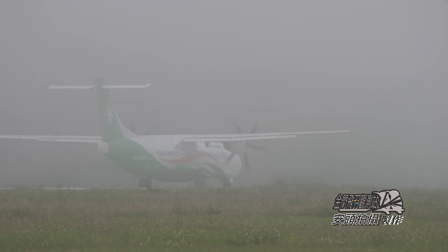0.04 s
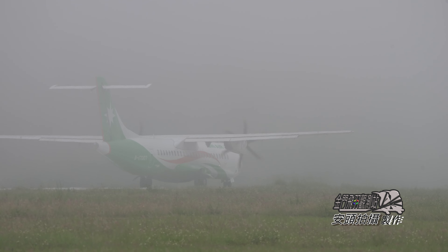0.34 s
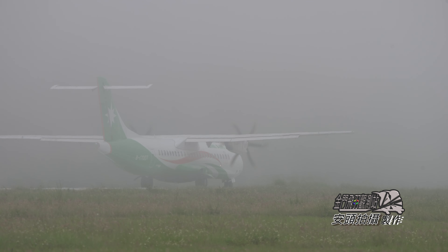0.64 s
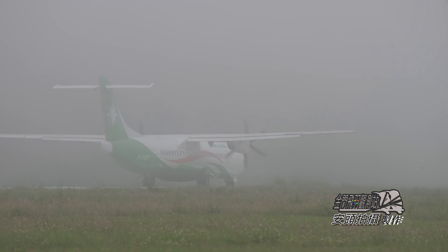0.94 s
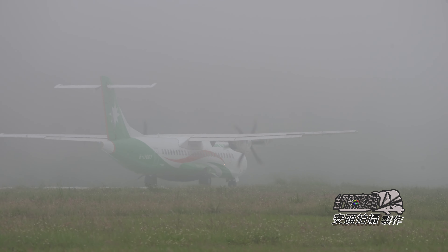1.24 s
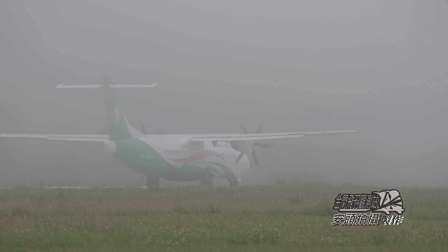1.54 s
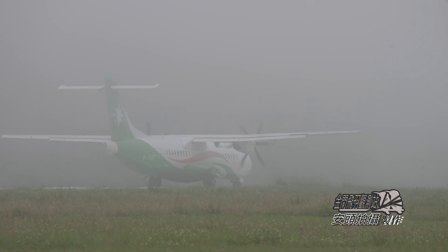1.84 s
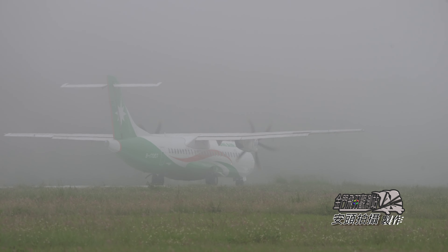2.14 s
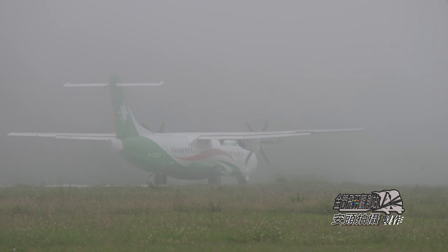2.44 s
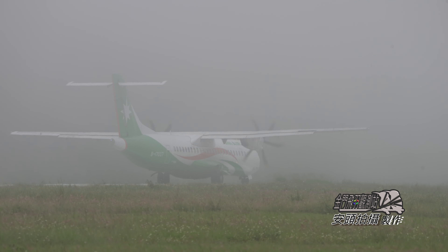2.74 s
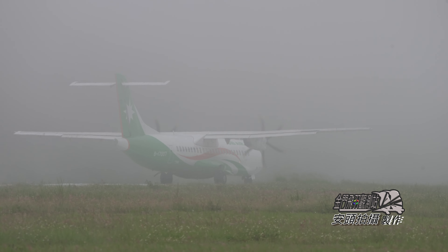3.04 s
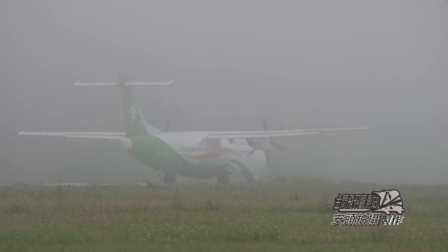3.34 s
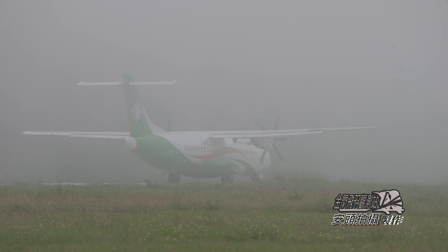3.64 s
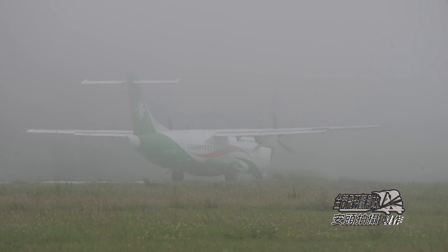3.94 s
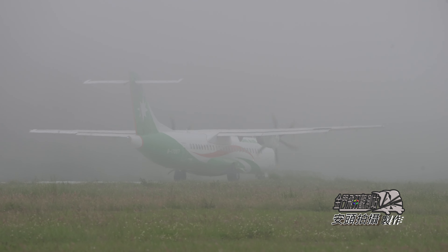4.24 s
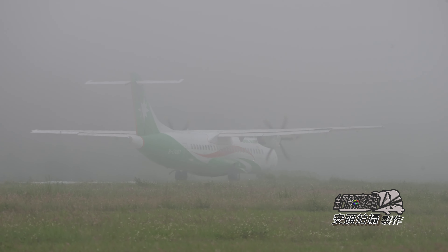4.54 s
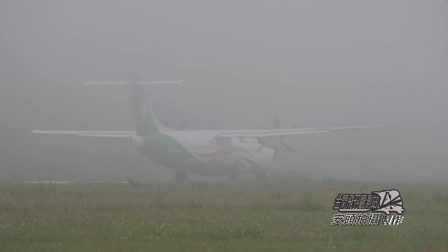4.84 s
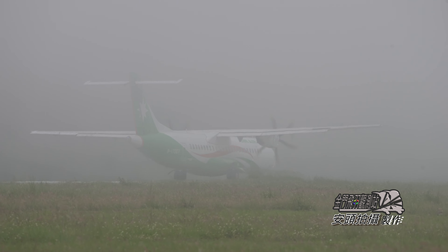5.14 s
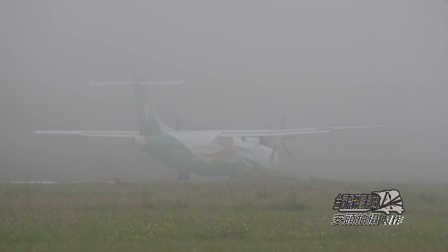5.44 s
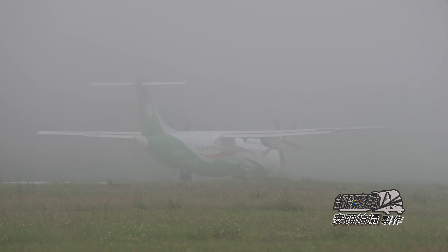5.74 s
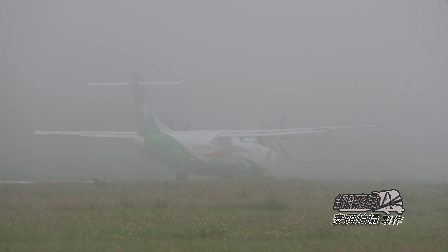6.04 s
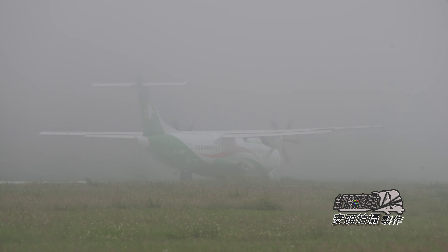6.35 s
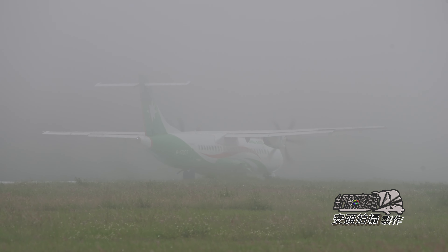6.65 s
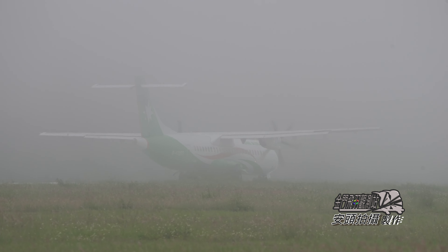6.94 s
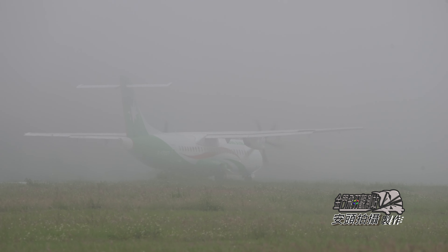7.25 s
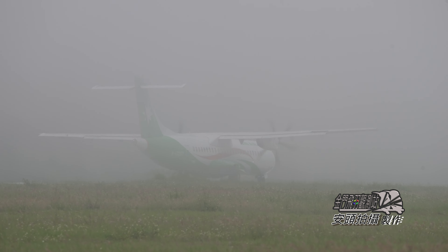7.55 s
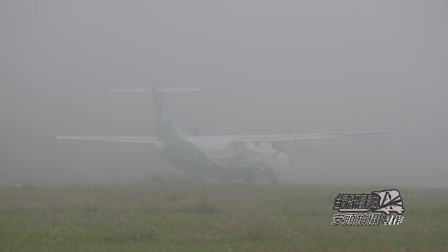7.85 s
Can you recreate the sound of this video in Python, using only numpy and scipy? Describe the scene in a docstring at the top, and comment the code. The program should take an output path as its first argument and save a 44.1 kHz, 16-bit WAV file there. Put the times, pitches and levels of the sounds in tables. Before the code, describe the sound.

A twin turboprop airliner taxis far off across a grass field, its propellers droning unevenly under a turbine hiss and faint whine. As it turns away, the rush of blown air swells and brightens, and the propellers rise in pitch. Wind thumps and flutters on the microphone throughout. Close by, a faint, high, insect-like buzz comes and goes, and a tiny motor whirs softly, then stops.

```python
"""A distant turboprop taxiing in the wind

A twin turboprop airliner taxis far off across a grass field. Its propellers drone and its turbines
hiss and whine; as it turns away, the air blown back by the propellers swells and brightens.
Wind buffets the microphone, a thin high buzz comes and goes close by, and a tiny motor,
probably in the lens, whirs faintly and stops."""
import sys
import numpy as np
from scipy import signal
from scipy.fft import rfft, irfft, next_fast_len
from scipy.io import wavfile
from scipy.ndimage import uniform_filter1d, map_coordinates

SR = 44100
rng = np.random.default_rng(int(sys.argv[2]) if len(sys.argv) > 2 else 0)


def unload_audio(sound):
    """Save the sound as a 16-bit wav file, at the path given as the first command line argument."""
    columns = np.transpose(np.atleast_2d(sound))
    # keep every value between -1 and 1, then stretch to whole-number steps
    steps = np.round(np.clip(columns, -1, 1) * 32767)
    wavfile.write(sys.argv[1], SR, steps.astype(np.int16))


N = 357651


def undb(db):
    """Turn decibels into a number to multiply a sound by."""
    return 10 ** (np.asarray(db) / 20)


def unit(x):
    """Scale a sound to an average strength (rms) of 1."""
    return x / np.sqrt(np.mean(x ** 2))


def curves(table):
    """Join a table's timed points with straight lines, one curve for each value column."""
    times, *columns = np.transpose(table)
    return [np.interp(np.arange(N) / SR, times, column) for column in columns]


def wander(rate_hz):
    """A smooth random curve, about 1 in size, that changes about rate_hz times a second."""
    step = max(int(SR / rate_hz), 1)
    held = np.repeat(rng.standard_normal(N // step + 2), step)[rng.integers(step):][:N]
    return 1.35 * uniform_filter1d(uniform_filter1d(held, step), step)


def swells(events, rest_db):
    """A volume curve: a resting level with a smooth hump for each (peak_s, length_s, level_db)."""
    t = np.arange(N) / SR
    humps = (undb(db) * .5 ** (2 * ((t - peak_s) / length_s) ** 2) for peak_s, length_s, db in events)
    return np.sqrt(undb(rest_db) ** 2 + sum(hump ** 2 for hump in humps))


def fade(at_s, length_s):
    """Fall from 1 to 0 over length_s, centred on at_s."""
    return np.clip(.5 - (np.arange(N) / SR - at_s) / length_s, 0, 1)


def noise(colour):
    """Noise of strength 1, shaped by (pitch_hz, level_db) points."""
    size = next_fast_len(N)
    bins_hz = np.maximum(np.fft.rfftfreq(size, 1 / SR), 1)
    hz, db = np.transpose(colour)
    gain = undb(np.interp(np.log(bins_hz), np.log(hz), db))
    return unit(irfft(rfft(rng.standard_normal(size)) * gain, size)[:N])


def resonate(x, hz, width_hz):
    """Make a sound ring in a narrow band around hz, at strength 1."""
    b, a = signal.iirpeak(hz, hz / width_hz, fs=SR)
    return unit(signal.lfilter(b, a, signal.lfilter(b, a, x)))


def turning(hz):
    """The angle of something that turns hz times a second."""
    return 2 * np.pi * np.cumsum(hz) / SR


def eddies(colour, span_s):
    """The push of swirling air: noise evened out over span_s, ready to follow a gust."""
    swirl = noise(colour)
    return swirl / np.sqrt(uniform_filter1d(swirl ** 2, int(span_s * SR)))


# The breeze, with an early lull: time_s, relative_db
BREEZE_LEVELS = [(0, -26), (0.8, -27.5), (1.7, -34.5), (2.9, -34), (3.9, -27), (6.4, -24), (7.1, -25.5),
                 (8.11, -25)]
# Gusts on top of it: peak_s, length_s, thump_relative_db, flutter_relative_db
WIND_GUSTS = [(0.466, 0.23, -19.5, -33.5), (1.028, 0.085, -34, -41), (2.56, 0.19, -27.5, -41.5),
              (3.04, 0.058, -25.5, -46), (3.32, 0.078, -27.5, -47), (3.826, 0.25, -22.5, -45),
              (4.251, 0.15, -19, -37.5), (4.645, 0.23, -21, -33), (5.344, 0.41, -22, -42),
              (6.056, 0.16, -22.5, -35.5), (6.46, 0.2, -19.5, -26.5), (6.754, 0.36, -30, -36),
              (7.975, .4, -24, -28.5)]
# The tone of the deep thumps and of the lighter flutter: pitch_hz, relative_db
THUMP_COLOUR = [(2, -13), (7, 0.5), (12, 0.5), (22, -7.5), (40, -12.5), (60, -18.5), (100, -24.5),
                (160, -39), (300, -68.5), (700, -108)]
FLUTTER_COLOUR = [(30, -12.5), (70, -1.5), (120, 3), (175, -1), (230, -7), (320, -13), (500, -24),
                  (1200, -70)]

def wind(thump_gain_db, flutter_gain_db, unrest_db):
    """Big swirls of air thump the microphone and small ones flutter across it."""
    breeze_db = curves(BREEZE_LEVELS)[0]
    flutter_rest_db = -21 + 0.64 * breeze_db  # small swirls grow more slowly than the breeze
    thump_level = swells([(s, length, db) for s, length, db, _ in WIND_GUSTS], breeze_db)
    flutter_level = swells([(s, length, db) for s, length, _, db in WIND_GUSTS], flutter_rest_db)
    thumps = undb(thump_gain_db) * thump_level * eddies(THUMP_COLOUR, span_s=0.222)
    flutter = undb(flutter_gain_db) * flutter_level * eddies(FLUTTER_COLOUR, span_s=0.14)
    return undb(unrest_db * wander(10)) * (thumps + flutter)


# The two high notes that ring in the buzz: pitch_hz, width_hz, relative_db
BUZZ_RINGS = [(8600, 380, -4), (9100, 280, -11)]
# Bursts of buzzing: peak_s, length_s, level_db
BUZZ_BURSTS = [(0.7, 0.49, -62.5), (1.42, .24, -64), (1.98, .26, -63.5), (2.44, .2, -66), (3.35, .38, -67),
               (3.98, 0.2, -61), (4.4, .25, -69), (5.15, .2, -69), (6.43, .22, -68), (6.8, .3, -70)]

def high_buzz(tick_hz, jitter, rasp):
    """Fast, scratchy ticks ring two high notes, perhaps an insect in the grass."""
    cycles = turning(tick_hz * (1 + jitter * wander(22))) / (2 * np.pi)
    samples_from_tick = (np.mod(cycles, 1) - .5) * SR / tick_hz
    ticks = np.exp(-samples_from_tick ** 2 / 2)
    scratch = np.sin(np.pi * cycles) ** 4 * rng.standard_normal(N)
    ring = sum(undb(db) * resonate(ticks + rasp * scratch, hz, width) for hz, width, db in BUZZ_RINGS)
    return swells(BUZZ_BURSTS, rest_db=-74) * unit(ring)


# The tones of the gears: multiple_of_motor_speed, relative_db
GEAR_TONES = [(34, -3), (36, 6.5), (38, 5), (40, 0), (41, 10), (42, -7), (43, 7), (44, -6), (45, 3),
              (47, -1)]
# Moments when the whir grows louder: peak_s, length_s, level_db
WHIR_SWELLS = [(0.6, 0.27, -59), (1.75, .9, -57), (4.72, .22, -55.5)]

def small_motor(spin_hz, wobble, wobble_hz, flicker_db, stop_s):
    """Tiny gears whir, then stop; their speed wobbles with each turn of a slow wheel."""
    hz = spin_hz - 2.5 * (1 - fade(at_s=6.6, length_s=.2))
    drift = .001 * wander(2)
    wheel = np.sin(turning(wobble_hz * (1 + 0.209 * wander(5))))
    jitter = 0.003 * wander(60)
    angle = turning(hz * (1 + drift + wobble * wheel + jitter))
    whir = sum(undb(db + flicker_db * wander(22.25)) * np.sin(k * angle + rng.uniform(0, 2 * np.pi))
               for k, db in GEAR_TONES)
    return swells(WHIR_SWELLS, rest_db=-60) * fade(stop_s, length_s=.06) * unit(whir)


# How far the aircraft has turned its tail to us: time_s, share (0 to 1)
TAIL_TURN = [(0, 0.06), (3.15, 0.01), (4.8, 0.26), (6.05, .42), (6.65, 0.67), (7.1, 0.83), (7.8, 1),
             (8.11, .95)]

def tail_on(narrowness):
    """How much of a backward beam of sound points at us; a narrow beam arrives late in the turn."""
    return np.maximum(curves(TAIL_TURN)[0], 0) ** narrowness


def beamed(side_db, rise_db, narrowness):
    """The volume of a noise that grows as the tail swings round."""
    return undb(side_db + rise_db * tail_on(narrowness))


def ground_echo(direct, delay_s, side_share, tail_share):
    """A duller copy bounces off the ground and arrives just late, colouring the sound."""
    late = map_coordinates(direct, [np.arange(N) - SR * delay_s], order=1)
    dull = signal.sosfilt(signal.butter(1, 5000, fs=SR, output="sos"), late)
    share = side_share + (tail_share - side_share) * tail_on(narrowness=6.7)
    return direct + share * dull


def open_air(x, shimmer_db, band_count=12):
    """Restless air on the long way to us makes each half octave swell and fade."""
    size = next_fast_len(N)
    spectrum = rfft(x, size)
    bins_hz = np.maximum(np.fft.rfftfreq(size, 1 / SR), 1)
    place = np.clip(2 * np.log2(bins_hz / 200), 0, band_count - 1)  # half octaves above 200 Hz
    bands = (irfft(spectrum * np.maximum(1 - abs(place - k), 0), size)[:N] for k in range(band_count))
    return sum(band * undb(shimmer_db * wander(8)) for band in bands)


# Engine duct notes that sweep past us in the turn: peak_s, length_s, level_db, pitch_hz, width_hz
DUCT_NOTES = [(4.02, 0.88, -46.5, 1660, 350), (5.1, 1.3, -49.5, 813, 220)]

def compressor(whine_hz, whine_db, whine_ends_s):
    """The engine's blades whine until the intakes turn away; its air ducts ring at lower pitches."""
    whine = resonate(rng.standard_normal(N), whine_hz, width_hz=205)
    ducts = sum(swells([(s, length, db)], rest_db=-59.5) * resonate(rng.standard_normal(N), hz, width)
                for s, length, db, hz, width in DUCT_NOTES)
    return undb(whine_db) * fade(whine_ends_s, length_s=.3) * whine + ducts


# The tone of the exhaust, the propeller wash and the turbines: pitch_hz, relative_db
EXHAUST_COLOUR = [(100, -2.5), (300, -7.5), (470, 0), (640, 0.5), (780, -2), (950, -3), (1300, -14),
                  (2500, -56)]
WASH_COLOUR = [(480, -14.5), (630, -3.5), (780, -6), (950, 1.8), (1100, 2), (1250, 1), (1400, 1),
               (1600, 0.1), (1850, 1), (2200, -6), (2500, -7), (2950, -8.5), (3700, -22.5), (8000, -68)]
TURBINE_COLOUR = [(1200, -16.5), (2000, 3.5), (2900, 2), (3700, -1.5), (4400, -2), (5200, -5.5),
                  (6000, -7.5), (6700, -10.5), (7200, -16.5), (7900, -19), (8800, -29), (10000, -41),
                  (13000, -62)]
# How each is aimed backwards: side_on_db, tail_on_rise_db, narrowness
EXHAUST_AIM = (-44, 8.4, 1.12)
WASH_AIM = (-44.5, 16.76, 0.96)
TURBINE_AIM = (-44, 11.8, 3.8)

def rushing_air(chop):
    """The exhaust roars, the turbines hiss, and the blades lightly chop the air they blow back."""
    blade_hz = curves(FIRST_PROPELLER)[0]
    blades = 1 + chop * np.cos(turning(blade_hz))
    roar = beamed(*EXHAUST_AIM) * noise(EXHAUST_COLOUR)
    wash = beamed(*WASH_AIM) * noise(WASH_COLOUR) * blades
    hiss = beamed(*TURBINE_AIM) * noise(TURBINE_COLOUR)
    return roar + wash + hiss


def propeller(course, tones, waver, scatter):
    """Passing blades make a drone; swirling air scatters it, so each tone beats and breaks up."""
    blade_hz, level_db = curves(course)
    angle = turning(blade_hz * (1 + waver * wander(14)))
    drone = np.zeros(N)
    for multiple, db in tones:
        scattered = scatter * (wander(18) + 1j * wander(18))  # shifts both strength and timing
        drone += (undb(db) * (1 + scattered) * np.exp(1j * multiple * angle)).imag
    return undb(level_db) * unit(drone)


# Each propeller's pitch (blades passing per second) and loudness: time_s, pitch_hz, level_db
FIRST_PROPELLER = [(0, 84.9, -43.5), (2.5, 84.7, -37), (3.3, 82.5, -39.5), (4.2, 76.64, -30.5),
                   (4.7, 81.2, -35.5), (5.9, 87.07, -38), (6.45, 95, -29), (7.2, 109, -32),
                   (7.55, 113.7, -27), (8.11, 113.1, -37)]
SECOND_PROPELLER = [(0, 65, -40.5), (.85, 65.3, -35.5), (2.1, 64.5, -34.5), (3.3, 62.3, -33.5),
                    (3.6, 61, -41.5), (5.2, 59, -51), (6.4, 74, -38), (7.2, 93.1, -39.5), (7.7, 99.5, -34),
                    (8.11, 98, -30.5)]
# The tones in each drone: multiple_of_pitch, relative_db
FIRST_TONES = [(1, 2), (2, -6), (3, -16.5), (4, -28)]
SECOND_TONES = [(1, -12), (2, 2.5), (3, -51), (4, -19)]

def twin_propellers():
    """Two propellers drone at different pitches, and both speed up late in the turn."""
    first = propeller(FIRST_PROPELLER, FIRST_TONES, waver=0.0139, scatter=0.75)
    second = propeller(SECOND_PROPELLER, SECOND_TONES, waver=0.0141, scatter=0.82)
    return first + second


def scene():
    """The distant aircraft, with the wind and the small near sounds in front of it."""
    drone = twin_propellers()
    engines = rushing_air(chop=0.079) + compressor(whine_hz=4560, whine_db=-55.5, whine_ends_s=3.1)
    echoed = ground_echo(engines, delay_s=1 / 614, side_share=0.025, tail_share=0.1)
    far_engines = open_air(echoed, shimmer_db=0.67)
    buzz = high_buzz(tick_hz=103.15, jitter=.0014, rasp=0.098)
    whir = small_motor(spin_hz=162.6, wobble=0.0065, wobble_hz=6.8, flicker_db=3, stop_s=5.79)
    gusts = wind(thump_gain_db=7.0, flutter_gain_db=3.5, unrest_db=0.73)
    return (gusts + buzz + whir + far_engines + drone)[None]


def record(dry):
    """The microphone adds a faint, even hiss, and the highest treble is cut off."""
    hiss = undb(-62) * rng.standard_normal(dry.shape)
    treble_cut = signal.ellip(14, .1, 80, 15650, fs=SR, output="sos")
    return signal.sosfilt(treble_cut, dry + hiss)


dry = scene()
out = record(dry)
unload_audio(out)
```